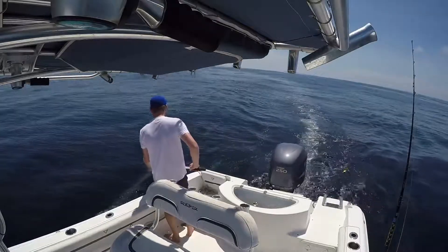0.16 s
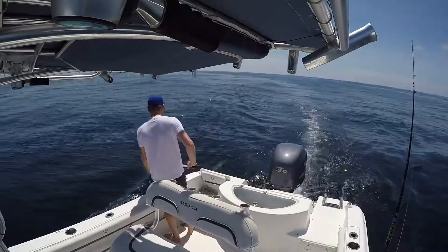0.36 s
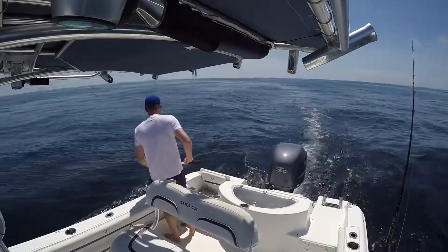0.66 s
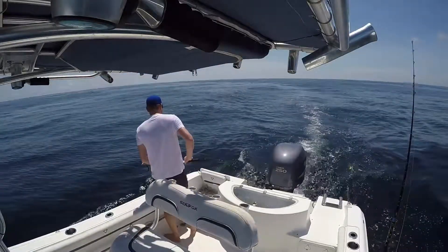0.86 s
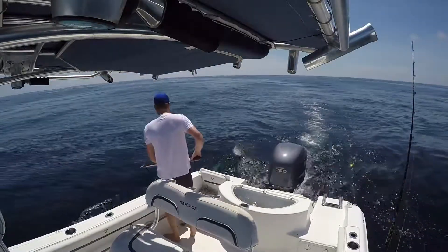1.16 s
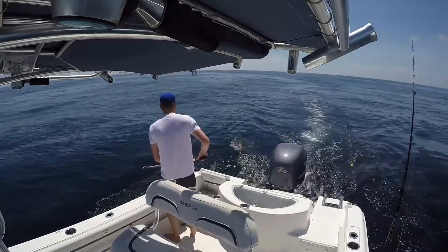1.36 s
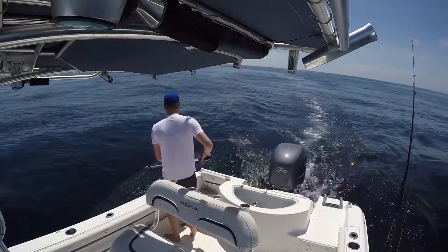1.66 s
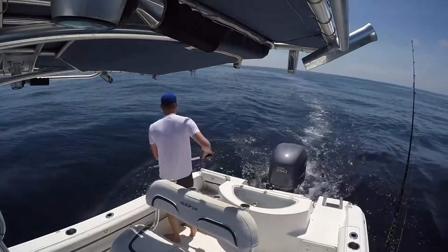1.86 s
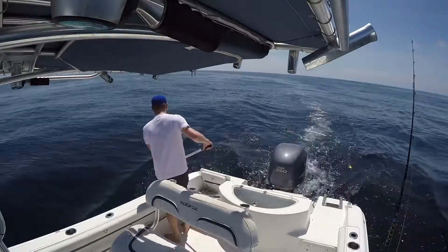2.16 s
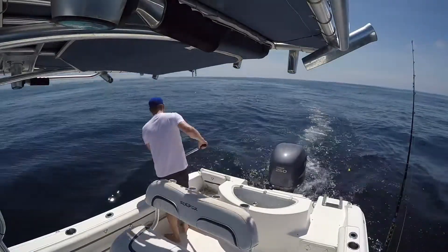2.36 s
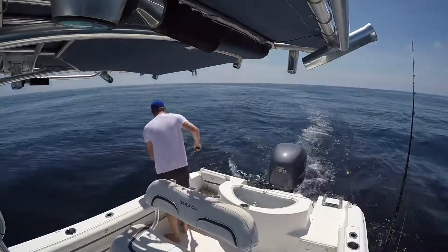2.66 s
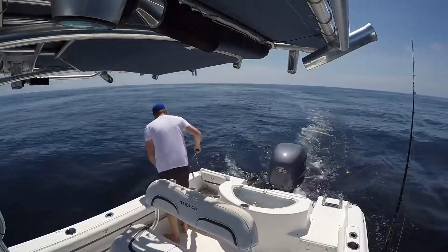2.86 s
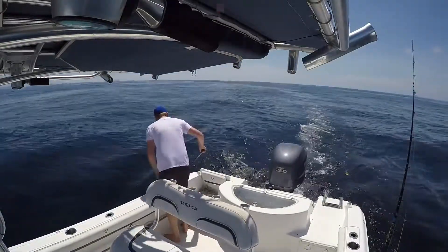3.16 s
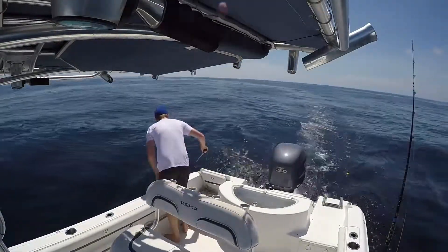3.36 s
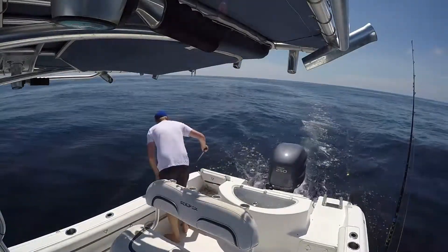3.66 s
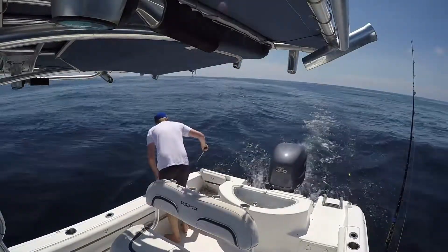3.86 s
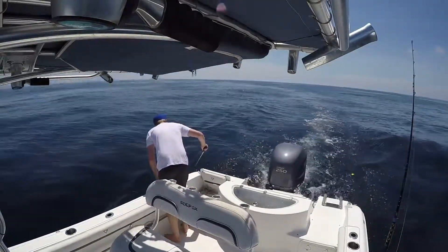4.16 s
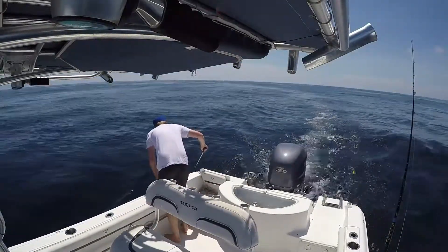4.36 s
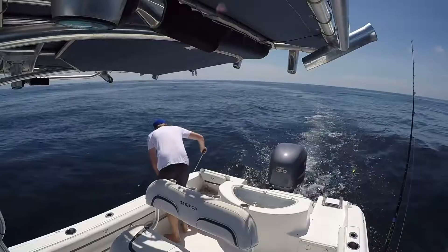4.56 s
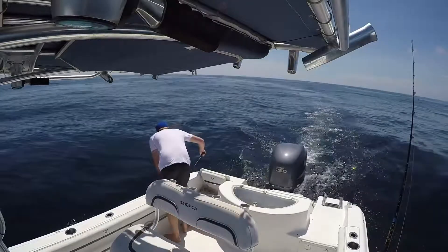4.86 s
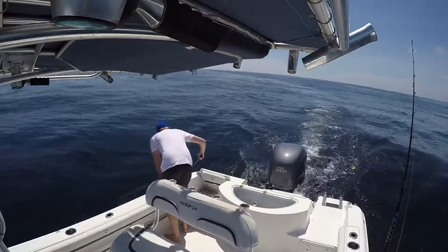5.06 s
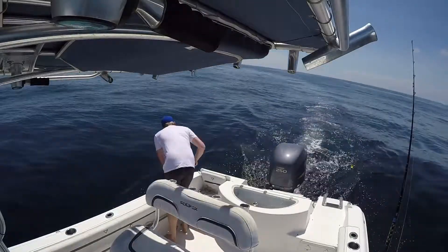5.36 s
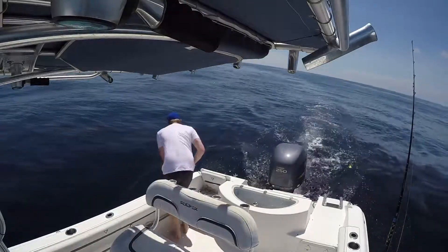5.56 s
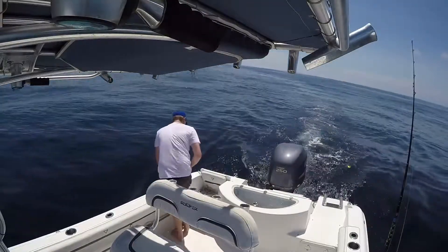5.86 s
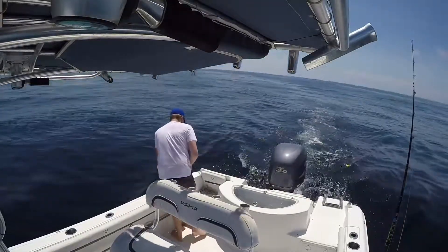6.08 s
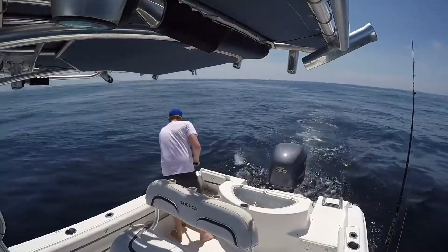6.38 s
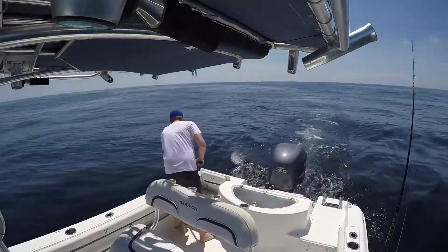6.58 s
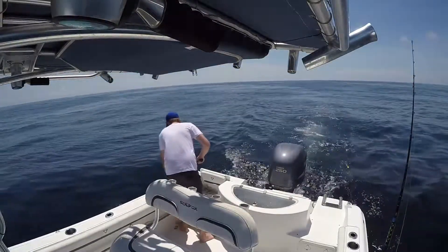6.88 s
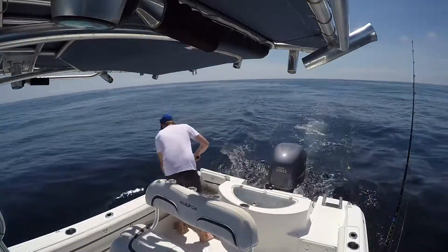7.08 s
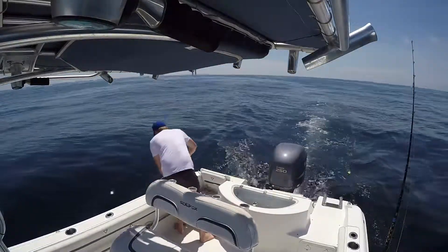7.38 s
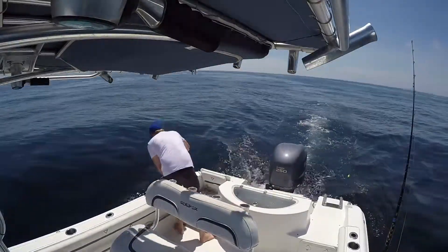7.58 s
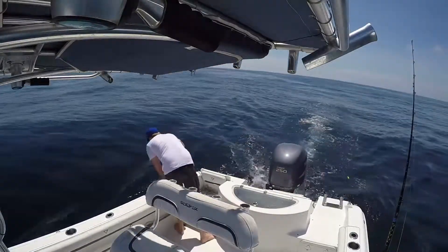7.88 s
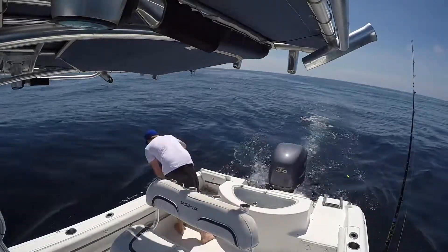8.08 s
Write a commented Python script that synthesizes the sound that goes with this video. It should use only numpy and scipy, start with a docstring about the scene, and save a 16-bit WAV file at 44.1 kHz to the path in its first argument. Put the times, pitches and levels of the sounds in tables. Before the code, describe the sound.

Heard from under the hard roof of a small boat moving slowly over choppy sea, an outboard motor keeps up a low hum and rumble throughout. Water washes along the hull and bubbles in the wake. Light slaps come first, then a hard cluster of hollow knocks that makes the roof boom. Three more strong runs of knocks follow, with two faint hisses of spray in between.

```python
"""An outboard motor pushes a small fishing boat slowly over a choppy sea.
From the start the motor drones and shakes the hardtop, the wake gurgles, foam hisses and a camera
whines faintly. Waves slap the hull and set off hollow, chattering knocks, hardest from 1.6 to 2.1 s.
Spray hisses at 2.6 s, knocks run again at 3.3 s, and a longer sheet of spray follows at 4.5 s.
Further runs of knocks come at 5.3 and 7.6 s."""
import sys
import numpy as np
from scipy import signal
from scipy.fft import rfft, irfft, next_fast_len
from scipy.io import wavfile
from scipy.ndimage import uniform_filter1d

SR = 44100
rng = np.random.default_rng(int(sys.argv[2]) if len(sys.argv) > 2 else 0)


def store_wav(level_fs):
    """Save 16-bit WAV to argv[1]."""
    pcm = np.round(np.clip(np.atleast_2d(level_fs), -1, 1) * 32767)
    wavfile.write(sys.argv[1], SR, pcm.T.astype(np.int16))


N = 362943
T = np.arange(N) / SR

# Noise spectra. Each row: frequency in Hz, relative density in dB.
FOAM_SPECTRUM = [(200, 8.5), (900, -1.5), (1550, 3.5), (2300, 6.5), (3000, 1.5), (3750, 8), (4450, 0),
                 (4950, 2), (5700, -4), (6450, -1), (7700, -8), (10500, -11), (15000, -14.5)]
SPRAY_SPECTRUM = [(2000, -20), (3150, -11), (3600, 0), (4400, -4.5), (5000, -2.5), (5750, -9), (6400, -4),
                  (7100, -6), (7800, -13), (10800, -13), (12000, -19), (12800, -22.5), (15000, -29.5)]
DROP_SPECTRUM = [(1500, -18), (3000, -4), (3800, 5.5), (5500, -5.5), (7000, -5), (8200, -14.5),
                 (14000, -26.5)]
WASH_SPECTRUM = [(60, -1), (110, -3), (150, -14.5), (185, -4.5), (235, 6.5), (300, 5), (380, -13),
                 (500, -8.5), (1000, -13.5), (3000, -38.5), (12000, -86)]
WAKE_SPECTRUM = [(300, -25), (400, 9), (480, 0.5), (620, -6), (1000, 4.5), (1330, 0), (1560, -6.5),
                 (1780, -7.5), (2400, -1), (2900, -16), (3800, -23.5), (6000, -39), (14000, -75)]
CRACK_SPECTRUM = [(200, -11), (450, -6.5), (1200, -4), (1580, -19), (2000, -9.5), (2550, -14),
                  (2850, -26.5), (3700, -26), (4500, -44), (12000, -69)]
RUMBLE_SPECTRUM = [(20, 2), (42, 2), (58, -10), (74, -3), (100, -16), (150, -18), (172, -11), (192, -14),
                   (214, 6), (236, -8), (295, -9), (370, -22), (600, -45), (2000, -80)]
# Level curves. Each row: time in seconds, level in dB.
FOAM_DB = [(0, -58), (.35, -58), (1.0, -60), (2.1, -57.5), (2.75, -59.5), (2.95, -60.5), (6.1, -60),
           (6.8, -59.5), (8.23, -59)]
SHAKE_DB = [(0, -29), (.25, -23.5), (.52, -38), (.8, -26.5), (1.25, -35), (1.6, -28), (2.1, -28),
            (2.37, -18.5), (2.5, -25), (3.05, -31), (3.8, -30.5), (4.22, -41), (4.5, -31), (5.15, -29.5),
            (5.42, -35), (5.8, -28.5), (7.2, -28), (8.23, -30)]
SECOND_ORDER_DB = [(0, -46), (.4, -40), (.7, -47.5), (1.1, -42.5), (1.8, -48.5), (2.3, -47), (2.8, -58),
                   (3.0, -42.5), (3.2, -41.5), (3.85, -53), (4.35, -43.5), (4.8, -46.5), (5.15, -52),
                   (5.6, -47.5), (6.05, -52), (7.0, -44.5), (7.6, -54), (8.23, -47.5)]
FIFTH_ORDER_DB = [(0, -41.5), (.2, -36.5), (.45, -42), (.8, -39.5), (1.3, -45.5), (1.9, -40.5),
                  (2.8, -53.5), (3.15, -53), (3.55, -39.5), (3.85, -38), (4.1, -42), (4.55, -40.5),
                  (5.2, -45.5), (5.9, -39.5), (6.9, -48), (7.3, -39.5), (7.6, -44.5), (8.23, -44.5)]
# Resonances. Each row: frequency in Hz, relative level in dB, 60 dB decay time in seconds.
SHELL_MODES = [(478, -4, 0.077), (516.2, -3, 0.095), (632.7, -4, 0.06), (744.6, -3.5, 0.09),
               (815, -17.5, 0.097), (948, -9, 0.07), (1037, -13.5, 0.039), (1105, -17.5, 0.081),
               (1146, -14.5, 0.083), (1350, -14, 0.069), (1421, -16, 0.073), (1761, -8.5, 0.058),
               (1936, -6.5, 0.027), (1993, -9.5, 0.041), (2223, -10.5, 0.058), (2290, -13.5, 0.077),
               (2539, -10.5, 0.049), (3280, -30, 0.048), (3510, -28.5, .03)]
BOOM_MODES = [(75.8, -19, 0.45), (215.6, -5.5, 0.21), (239.4, -9, 0.16), (270, -11, 0.16),
              (317, -15.5, 0.12)]
# Sheets of spray. Each row: start in seconds, length in seconds, level in dB.
SPRAY_SHEETS = [(2.567, 0.097, -58.5), (4.534, 0.435, -54)]
# Drops landing on the boat. Each row: start in seconds, level in dB.
DROP_HITS = [(1.56, -56), (2.21, -52), (2.24, -61), (2.46, -53.5), (3.05, -61), (3.105, -57), (3.737, -55),
             (6.28, -52), (7.11, -49), (7.554, -57)]
# Passing waves. Each row: crest time in seconds, half length in seconds, relative level in dB.
WAVE_SURGES = [(0.02, 0.097, -44), (.67, 0.24, -45), (1.03, 0.21, -55), (1.66, 0.18, -48.5),
               (2.04, 0.54, -52), (2.35, 0.23, -43.5), (2.62, 0.036, -47), (3.05, 0.16, -57),
               (4.12, .15, -44), (4.82, 0.21, -45), (6.12, .22, -44.5), (7.1, 0.15, -50.5),
               (7.8, 0.31, -56), (8.23, 0.058, -46)]
SOFT_SLAPS = [(0.24, 0.067, -33), (0.91, 0.13, -37.5), (1.59, 0.041, -36), (2.287, 0.06, -28.5),
              (2.488, 0.086, -41.5), (3.69, 0.046, -33), (4.174, .06, -43.5), (6.296, 0.025, -33.5),
              (8.22, 0.037, -39)]
# Large air pockets. Each row: start in seconds, pitch in Hz, relative level in dB.
WAKE_GULPS = [(0.678, 1144, -36), (0.785, 975, -31), (2.241, 992, -27.5), (2.374, 937, -29.5),
              (2.579, 948, -32), (3.936, 1230, -36.5), (4.121, 1200, -29.5), (4.195, 961, -26),
              (5.849, 1368, -43), (6.275, 1314, -34.5), (6.944, 990, -44), (7.283, 759, -33.5),
              (7.815, 1015, -36)]
# Wave blows. Each row: time in seconds, then relative level, hollow lows and treble, all in dB.
HULL_KNOCKS = [(0.073, -30, 2.5, -14), (0.166, -33.5, 2.5, -11), (0.255, -28, -3, -19),
               (0.574, -32, -22, -15), (0.628, -24, 2.5, -17.5), (0.914, -31.5, 4.5, -19),
               (0.96, -30.5, -4.5, -17), (1.047, -37.5, 0, -9), (1.606, -13, -6, -10),
               (1.655, -20, -1.5, -14), (1.709, -15, 1.5, -7.5), (1.76, -24.5, -6.5, -10.5),
               (1.812, -34.5, -6, -11), (1.854, -24.5, -0.5, -13), (1.953, -31.5, 0.5, -8),
               (2.013, -30.5, 3, -11.5), (2.052, -33, 2.5, -13), (2.109, -20.5, -5.5, -21.5),
               (2.513, -35, -23, -22), (2.558, -25, 1, -15.5), (2.662, -32, 0.5, -27),
               (3.125, -31, -33, -4), (3.328, -16.5, -0.5, -11), (3.409, -26, 2, -13.5),
               (3.461, -25.5, 1, -18.5), (3.616, -28.5, 1, -16.5), (3.673, -33, 3, -19),
               (3.711, -37, 4, -16), (3.772, -39.5, 8.5, -8.5), (4.363, -37, -2.5, -13),
               (4.56, -35, 1, -11), (4.633, -26.5, 0, -15.5), (4.753, -22.5, 4.5, -18),
               (5.293, -18.5, -11, -14.5), (5.406, -19.5, 3.5, -10.5), (5.443, -28, -1, -36),
               (5.506, -26, 1, -24), (5.532, -35.5, 3, -12), (5.784, -37, 4, -18), (6.117, -36, 5.5, -6),
               (6.566, -27.5, 4, -26), (7.361, -26.5, -20, -14), (7.464, -26, -19, -10),
               (7.627, -17, 3.5, -8), (7.686, -25.5, 0.5, -12.5), (7.742, -16.5, -0.5, -14.5),
               (7.793, -31.5, -1, -17), (7.855, -21, 4.5, -20), (7.951, -23, -1, -20.5)]
# Motor speed under the load of the swell. Each row: time in seconds, firing rate in Hz.
FIRING_HZ = [(0, 43.02), (.85, 43.57), (1.55, 42.88), (2.1, 43.36), (2.6, 42.36), (3.0, 43.32),
             (3.6, 42.95), (4.0, 43.3), (4.4, 42.8), (5.6, 43.57), (6.65, 44.34), (7.1, 42.78),
             (7.55, 42.58), (8.23, 43.3)]
# Weaker motor orders. Each row: multiple of the firing rate, level in dB.
WEAK_ORDERS = [(3, -61), (4, -61), (6, -59.5), (7, -63), (8, -72), (11, -68), (12, -73)]


def undb(db):
    """Decibels to gain."""
    return 10 ** (np.asarray(db) / 20)


def unit_rms(x):
    """Scale to an rms of 1."""
    return x / np.sqrt(np.mean(x ** 2))


def curve(table):
    """Join (seconds, value) rows by straight lines."""
    return np.interp(T, *np.transpose(table))


def wander(rate_hz):
    """Smooth random drift, spread near 1."""
    step = int(SR / rate_hz)
    levels = rng.standard_normal(2000)
    held = levels[np.arange(N) // step % len(levels)]
    return 1.693 * uniform_filter1d(uniform_filter1d(held, step), step)


def colour(x, spectrum):
    """Filter by (Hz, dB) rows; rms 1."""
    hz, db = np.transpose(spectrum)
    size = next_fast_len(N + 4096)
    bins_hz = np.arange(size // 2 + 1) * SR / size + 1
    gain = undb(np.interp(np.log(bins_hz), np.log(hz), db))
    return unit_rms(irfft(rfft(x, size) * gain, size)[:N])


def noise(spectrum):
    """Coloured noise; rms 1."""
    return colour(rng.standard_normal(N), spectrum)


def add(out, start_s, sound):
    """Mix in a short sound."""
    i = int(np.clip(start_s * SR, 0, N - 1))
    out[i:i + len(sound)] += sound[:N - i]


def swells(table):
    """Gain of bell-shaped waves; their powers add."""
    bells = (undb(db) * np.exp(-((T - crest_s) / half_s) ** 2) for crest_s, half_s, db in table)
    return np.sqrt(sum(bell ** 2 for bell in bells))


def ring(modes, rise_cycles, detune=0, spread_db=0, tilt=((500, 0), (2000, 0))):
    """Damped panel modes that build up over a few cycles, weighted by a (Hz, dB) tilt."""
    hz, db, t60_s = np.transpose(modes)[:, :, None]
    pitch_draw, level_draw = rng.standard_normal((2, len(modes), 1))
    gain = undb(db + np.interp(hz, *np.transpose(tilt)) + spread_db * level_draw)
    t = T[:SR // 3]
    cycles = hz * (1 + detune * pitch_draw) * t
    envelope = (1 - np.exp(-(cycles / rise_cycles) ** 2)) * np.exp(-np.log(1000) * t / t60_s)
    sign = (-1) ** np.arange(len(modes))[:, None]
    return np.sum(sign * gain * envelope * np.sin(2 * np.pi * cycles), axis=0)


def bubble(hz, rise_cycles, glide):
    """An air pocket rings, rising in pitch as it nears the surface."""
    age = np.arange(int(6 * rise_cycles * SR / hz)) * hz / SR / rise_cycles
    return np.e * age * np.exp(-age) * np.sin(2 * np.pi * rise_cycles * age * (1 + glide * age))


def camera_whine(pitch_hz=8550, frame_hz=59.94):
    """The camera's electronics sing in one short burst per frame."""
    frames = frame_hz * T
    slip_rad = 1.9 * rng.standard_normal(600)[frames.astype(int)]
    gate = uniform_filter1d(1. * (abs(frames % 1 - .5) < .25), SR // 500)
    return undb(-65) * gate * np.sin(2 * np.pi * pitch_hz * T + slip_rad)


def drops(attack_s=.00099, decay_s=.014, tick_decay_s=.003):
    """Larger drops spatter on the boat among tiny ticks."""
    gain = np.zeros(N)
    t = T[:SR // 8]
    for start_s, db in DROP_HITS:
        add(gain, start_s, undb(db) * (1 - np.exp(-t / attack_s)) * np.exp(-t / decay_s))
    for when, size in rng.random((60, 2)):
        add(gain, when * N / SR, undb(-68 + 10 * size ** 2) * np.exp(-t / tick_decay_s))
    return gain * undb(4.2 * wander(300)) * noise(DROP_SPECTRUM)


def spray(attack_s=.045, release_s=.04):
    """Foam hisses steadily; sheets of spray rise above it, hold and fall away."""
    sheet_gain = np.zeros(N)
    for start_s, length_s, db in SPRAY_SHEETS:
        corners_s = [0, attack_s, length_s, length_s + release_s]
        sheet_gain += undb(db) * np.interp(T - start_s, corners_s, [0, 1, 1, 0])
    foam = undb(curve(FOAM_DB) + .5 * wander(14)) * noise(FOAM_SPECTRUM)
    return foam + sheet_gain * undb(1.1 * wander(90)) * noise(SPRAY_SPECTRUM)


def hull_wash(floor_db=-57):
    """Water surges dully along the hull and slops against it."""
    flow = np.hypot(undb(-3) * swells(WAVE_SURGES), undb(floor_db))
    return np.hypot(flow, swells(SOFT_SLAPS)) * noise(WASH_SPECTRUM)


def wake():
    """Propeller and waves churn up bubbles, froth and large gulps; the shell rings along."""
    swarm = np.zeros(N)
    for when, pitch, life, size in rng.random((7000, 4)):
        db = -3 * np.log(1 - size * np.exp(-1 / 50))  # many faint, few loud
        add(swarm, when * N / SR, undb(db) * bubble(430 * 6 ** pitch, 2.3 + 3.24 * life, glide=.012))
    froth = .9 * rng.standard_normal(N)
    water = colour(unit_rms(swarm) + froth, WAKE_SPECTRUM)
    shell = unit_rms(signal.fftconvolve(rng.standard_normal(N), ring(SHELL_MODES, rise_cycles=1.3))[:N])
    surge = swells(WAVE_SURGES) * undb(2.8 * wander(25))
    churn = undb(-54 + 1.6 * wander(22))
    out = np.hypot(surge, churn) * (undb(-1.1) * water + undb(-7) * shell)
    for start_s, hz, db in WAKE_GULPS:
        add(out, start_s, undb(db - 5) * bubble(hz, rise_cycles=5.2, glide=.002))
        for lag, pitch in rng.random((5, 2)):  # the pocket breaks up
            fragment = bubble(hz * (.7 + .5 * pitch), rise_cycles=4.9, glide=.002)
            add(out, start_s + .025 * lag, undb(db - 14) * fragment)
    return out


def hull_knocks(attack_s=.0032, decay_s=.0087, tail_s=.024):
    """Each wave blow cracks and rings the shell; hard ones make the hull thud and the hardtop boom."""
    out = np.zeros(N)
    crack_noise = noise(CRACK_SPECTRUM)
    t = T[:SR // 3]
    envelope = (1 - np.exp(-t / attack_s)) * (np.exp(-t / decay_s) + .02 * np.exp(-t / tail_s))
    for time_s, db, hollow_db, treble_db in HULL_KNOCKS:
        # Place and softness of the blow weight the low and high modes.
        tilt = [(540, hollow_db + 3), (760, 0), (1300, 0), (1750, treble_db + 7.5)]
        shell = ring(SHELL_MODES, rise_cycles=2.36, detune=.0075, spread_db=3, tilt=tilt)
        crack = envelope * np.roll(crack_noise, -int(time_s * SR))[:len(t)]
        boom = ring(BOOM_MODES, rise_cycles=4.2, detune=.019, spread_db=3.2)
        force_db = db + .5 * hollow_db
        add(out, time_s - .0025, undb(db + .43 * treble_db - .3) * crack)
        add(out, time_s - .002, undb(db - 1.6) * shell)
        add(out, time_s + .0041, undb(1.56 * force_db + 16) * boom)
    return out


def hardtop_shake(sway_hz=30.44, twist_hz=38.15, twist_db=-3.5):
    """The frame's two lowest resonances beat in uneven throbs."""
    sway = np.sin(2 * np.pi * np.cumsum(sway_hz + 3.5 * wander(16)) / SR)
    twist = np.sin(2 * np.pi * np.cumsum(twist_hz + 2.5 * wander(12)) / SR)
    return undb(curve(SHAKE_DB) + 1.2 * wander(13)) * unit_rms(sway + undb(twist_db) * twist)


def motor(rumble_db=-41):
    """Firing orders drone, the fifth booming at a panel resonance; uneven firings stir a rumble."""
    phase = 2 * np.pi * np.cumsum(curve(FIRING_HZ)) / SR
    drone = undb(curve(SECOND_ORDER_DB) + wander(7.4)) * np.sin(2 * phase + .08 * wander(10))
    throb = 1 + .7 * np.tanh(wander(26))
    drone += undb(curve(FIFTH_ORDER_DB)) * throb * np.sin(5 * phase + .3 * wander(22))
    for order, db in WEAK_ORDERS:
        drone += undb(db + 2.5 * wander(9)) * np.sin(order * phase + .7 * wander(10))
    return np.sqrt(2) * drone + undb(rumble_db) * noise(RUMBLE_SPECTRUM)


def scene():
    """Mono mix, heard under the hardtop."""
    boat = motor() + hardtop_shake() + hull_knocks()
    return (boat + wake() + hull_wash() + spray() + drops() + camera_whine())[None]


def record(dry):
    """Steep low-pass."""
    cutoff_hz = 15100
    return signal.sosfilt(signal.ellip(10, .2, 80, cutoff_hz, fs=SR, output="sos"), dry)


dry = scene()
out = record(dry)
store_wav(out)
```